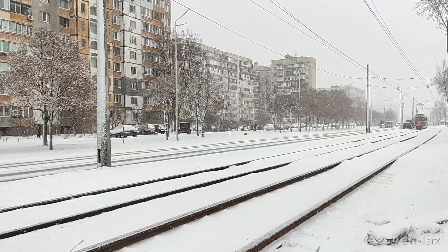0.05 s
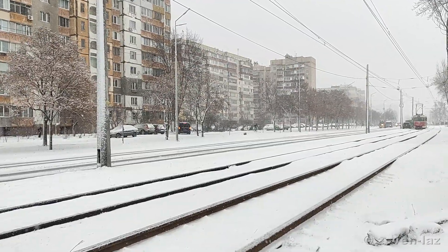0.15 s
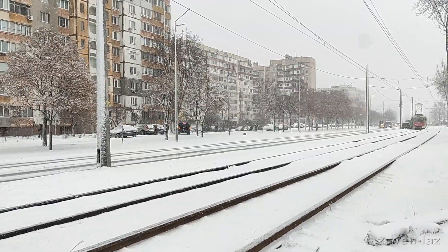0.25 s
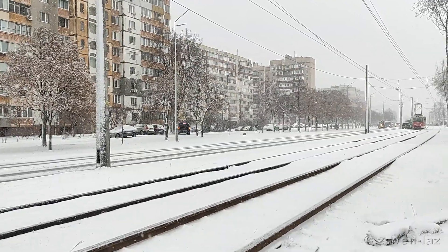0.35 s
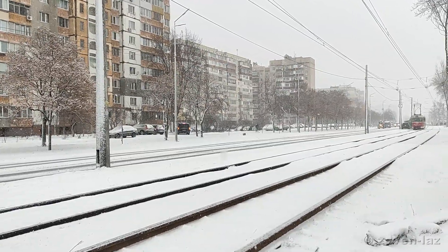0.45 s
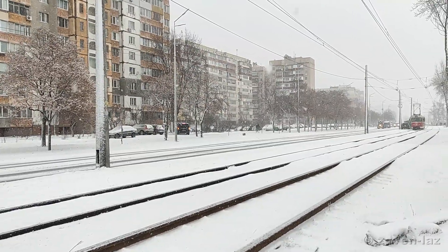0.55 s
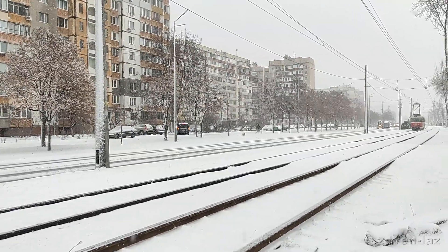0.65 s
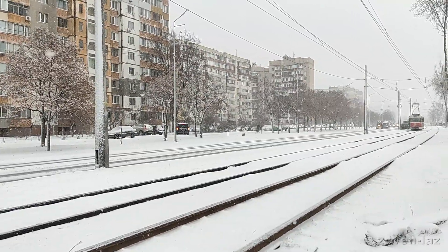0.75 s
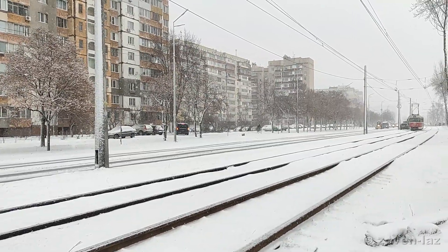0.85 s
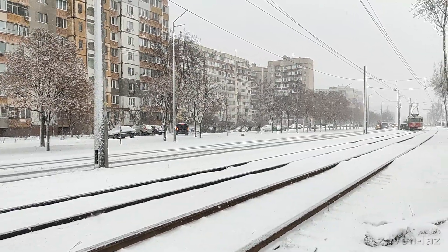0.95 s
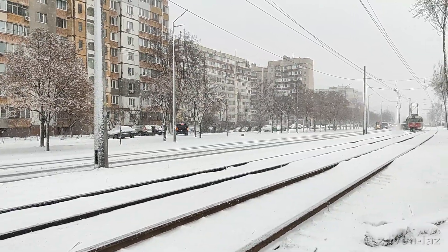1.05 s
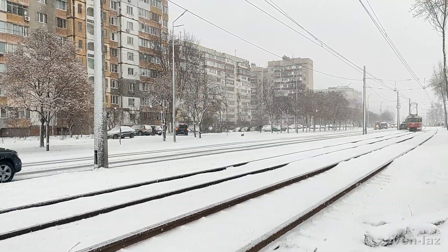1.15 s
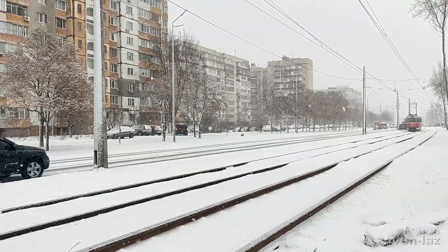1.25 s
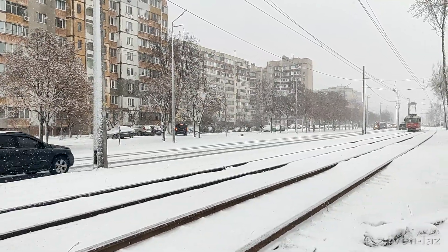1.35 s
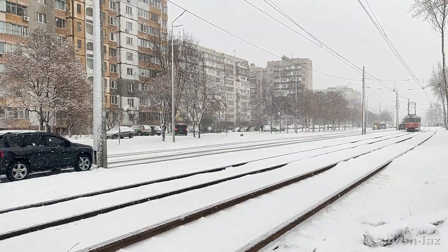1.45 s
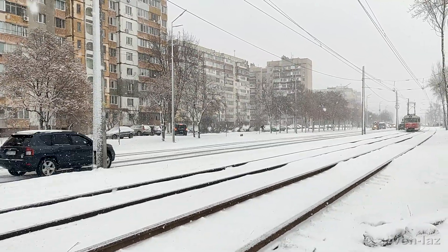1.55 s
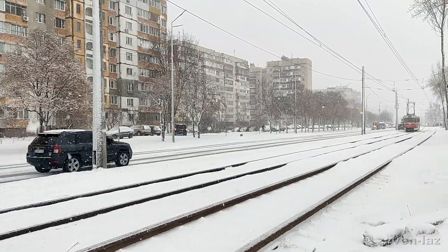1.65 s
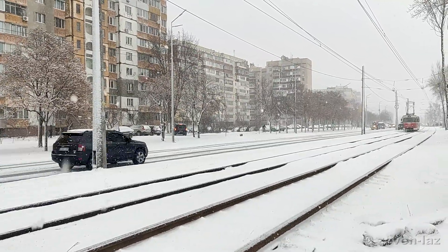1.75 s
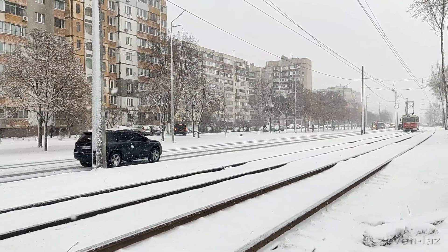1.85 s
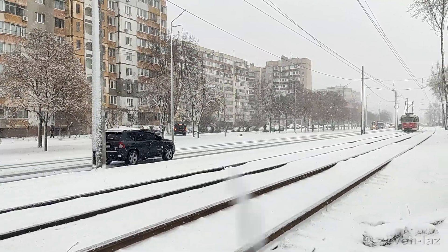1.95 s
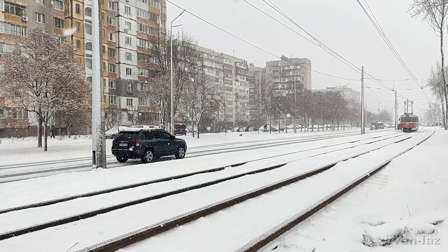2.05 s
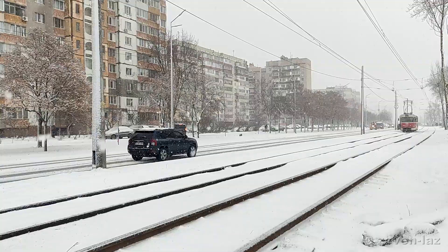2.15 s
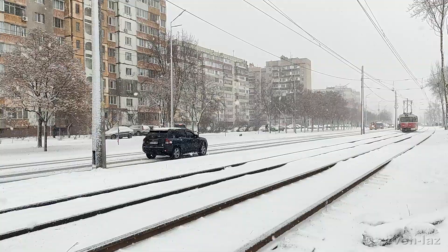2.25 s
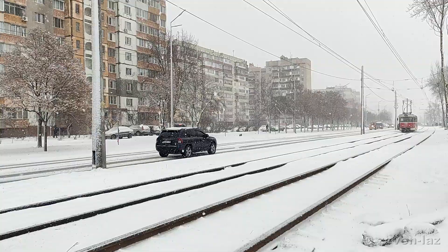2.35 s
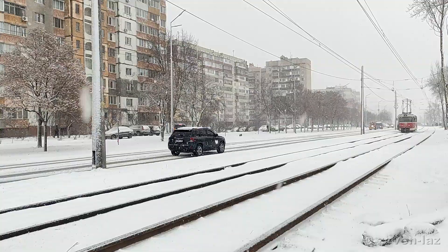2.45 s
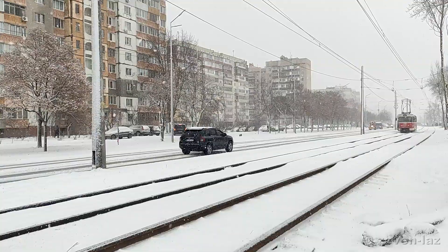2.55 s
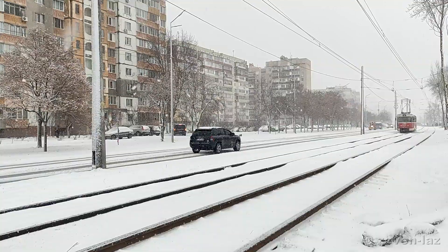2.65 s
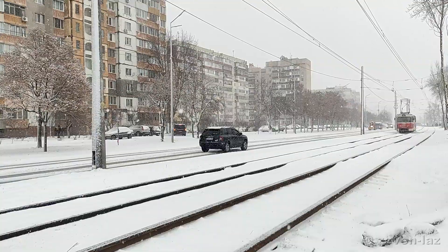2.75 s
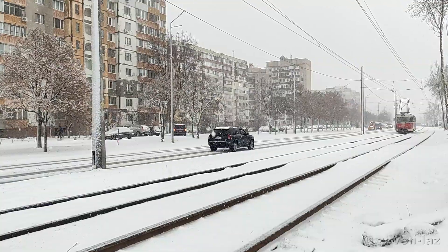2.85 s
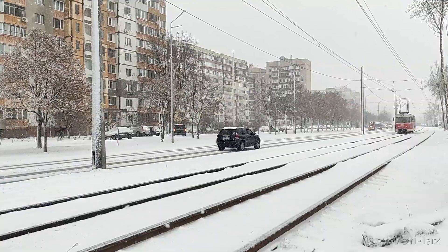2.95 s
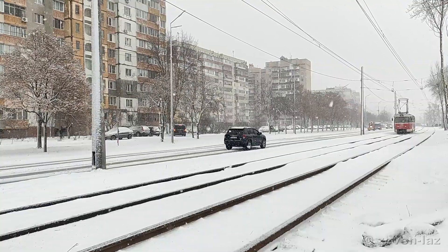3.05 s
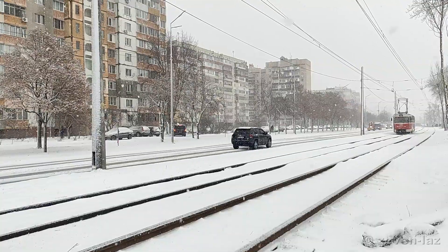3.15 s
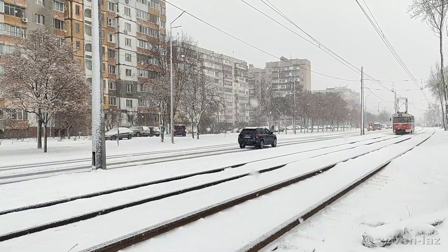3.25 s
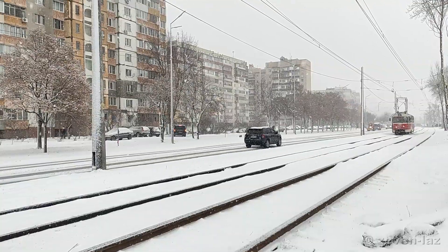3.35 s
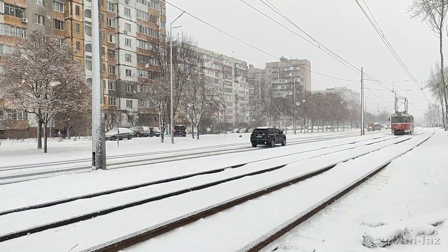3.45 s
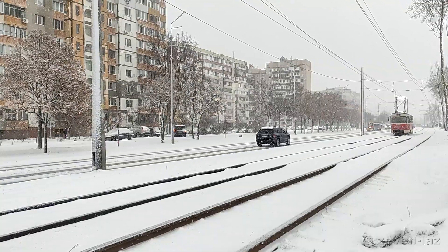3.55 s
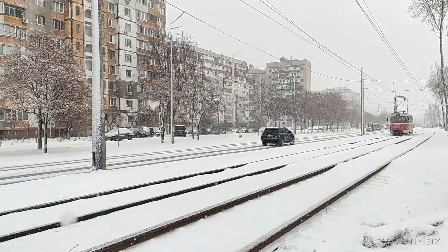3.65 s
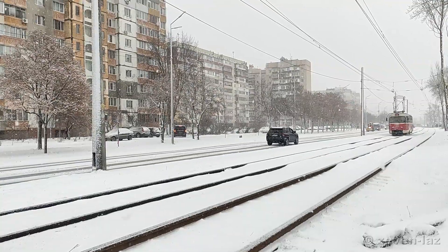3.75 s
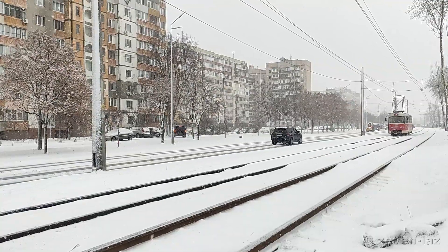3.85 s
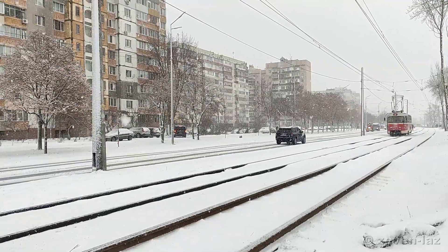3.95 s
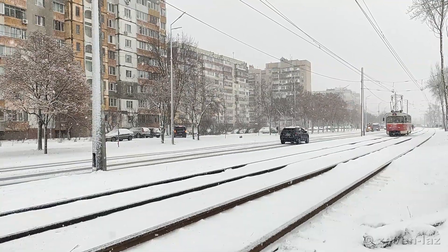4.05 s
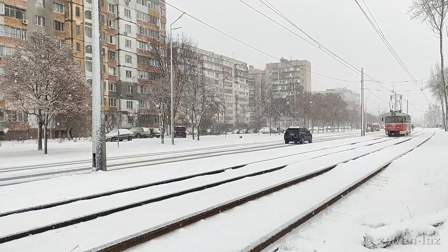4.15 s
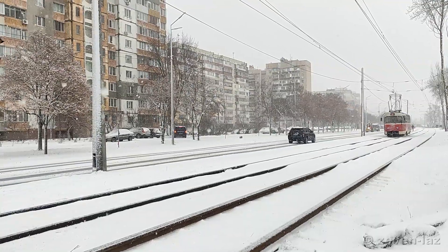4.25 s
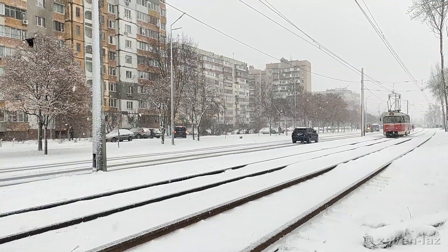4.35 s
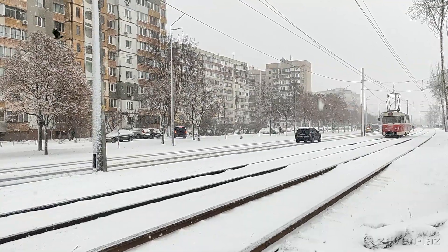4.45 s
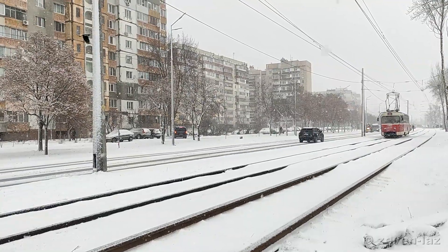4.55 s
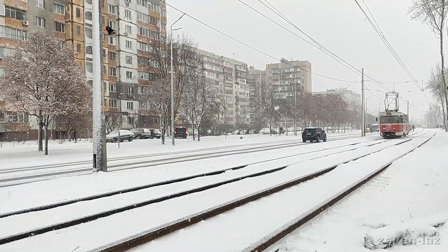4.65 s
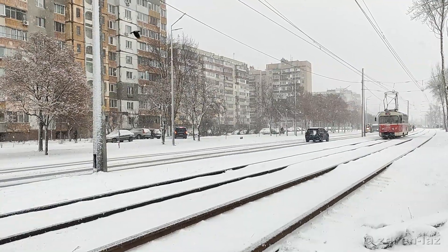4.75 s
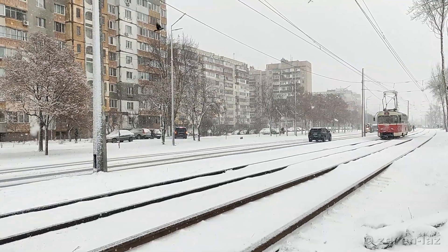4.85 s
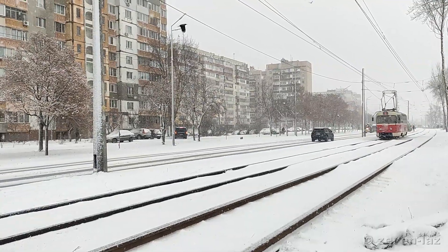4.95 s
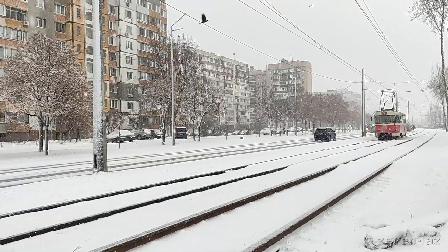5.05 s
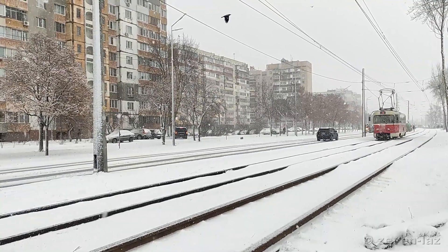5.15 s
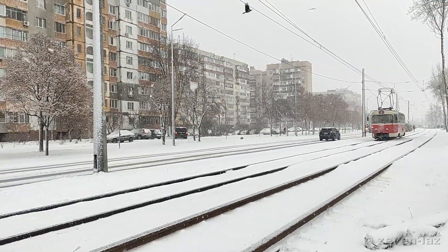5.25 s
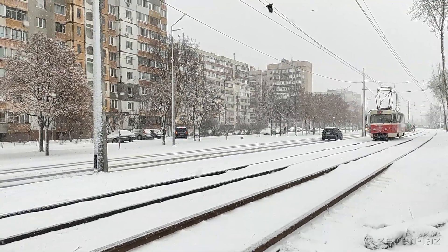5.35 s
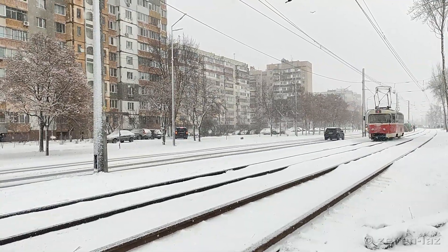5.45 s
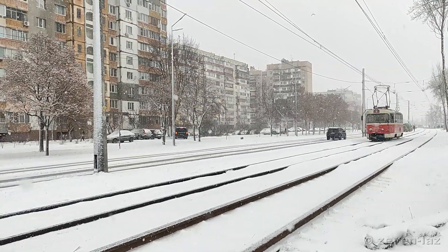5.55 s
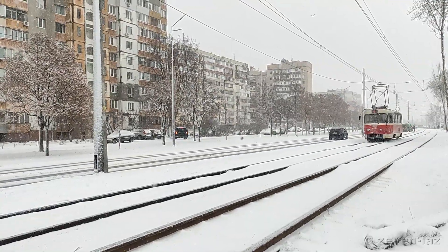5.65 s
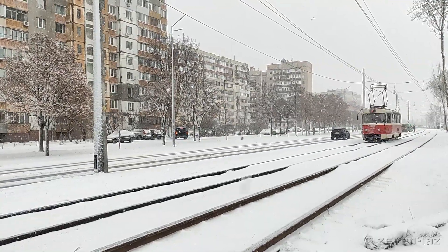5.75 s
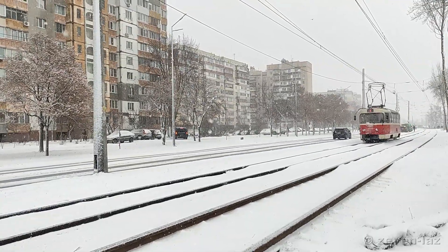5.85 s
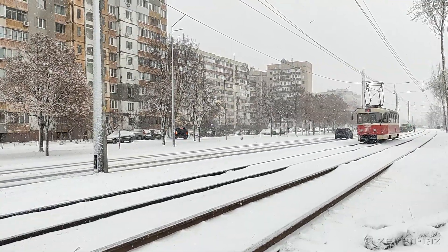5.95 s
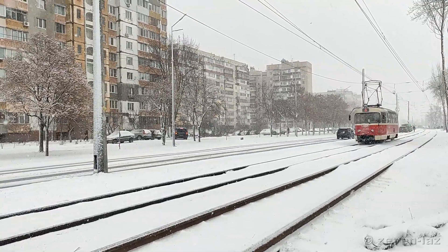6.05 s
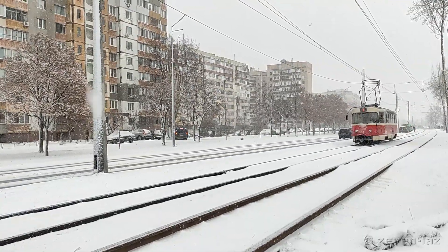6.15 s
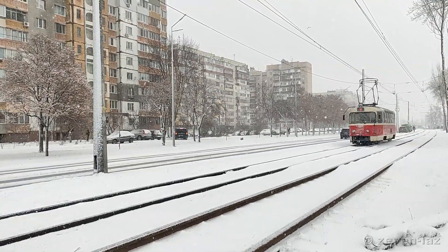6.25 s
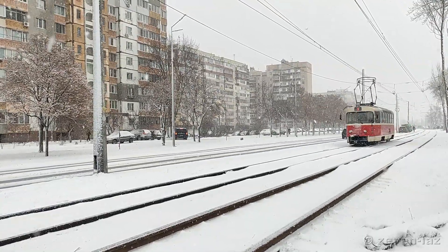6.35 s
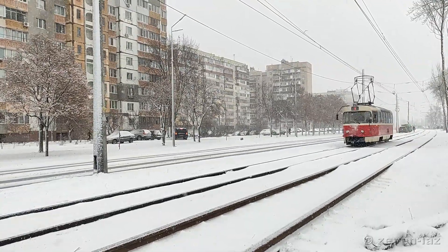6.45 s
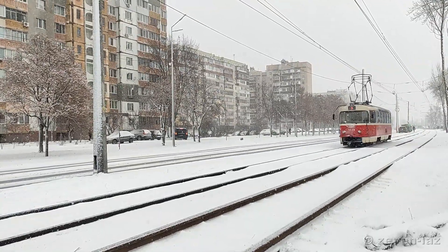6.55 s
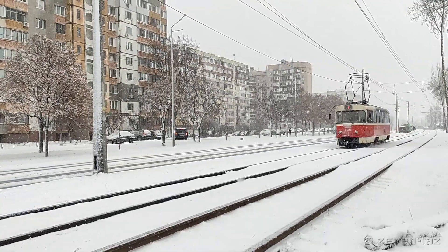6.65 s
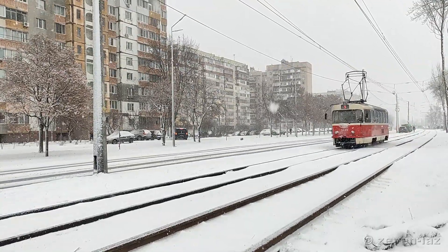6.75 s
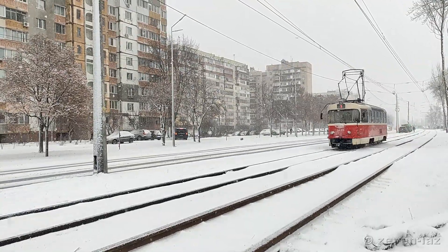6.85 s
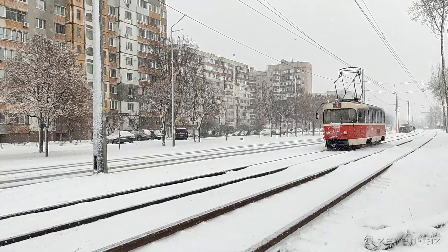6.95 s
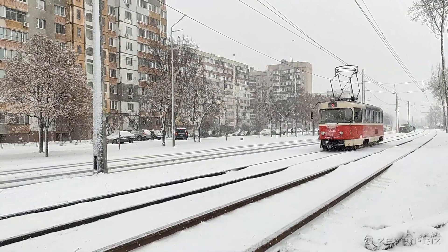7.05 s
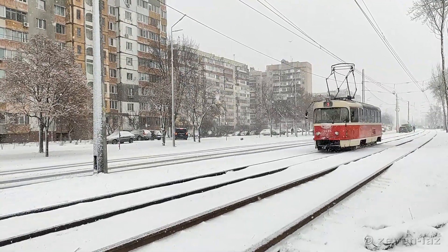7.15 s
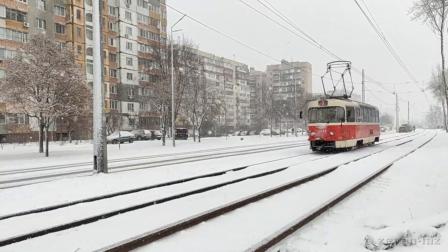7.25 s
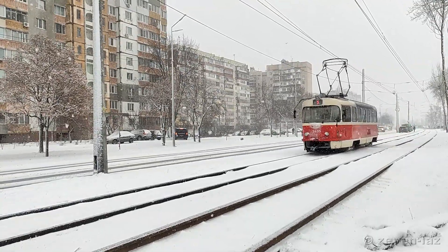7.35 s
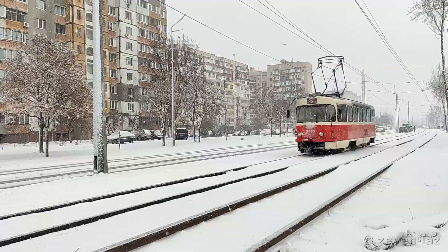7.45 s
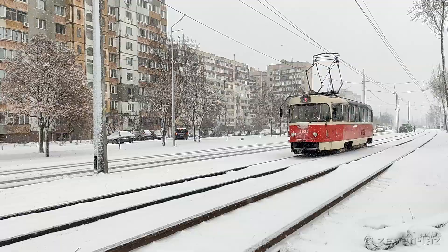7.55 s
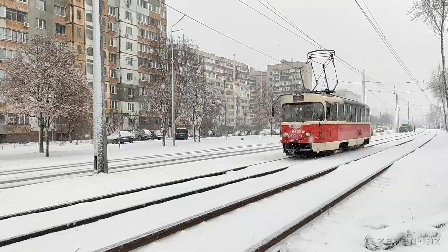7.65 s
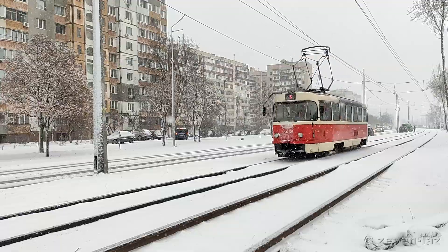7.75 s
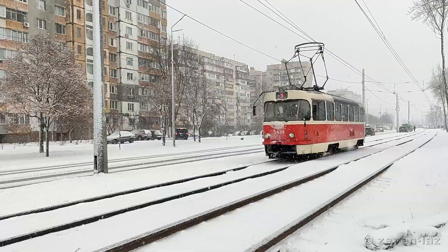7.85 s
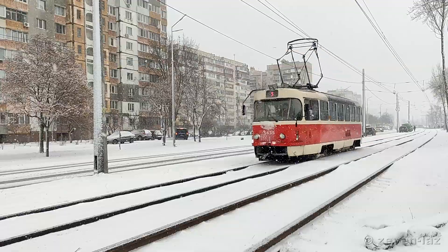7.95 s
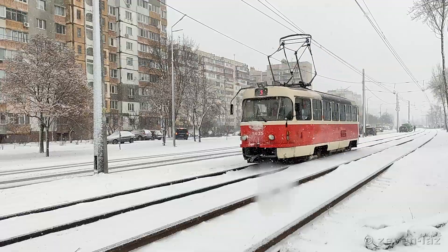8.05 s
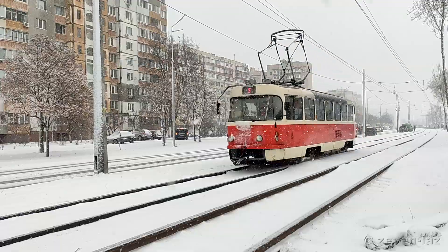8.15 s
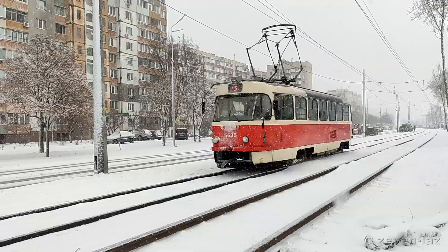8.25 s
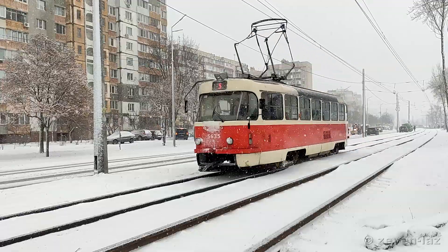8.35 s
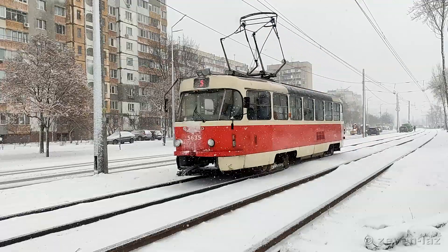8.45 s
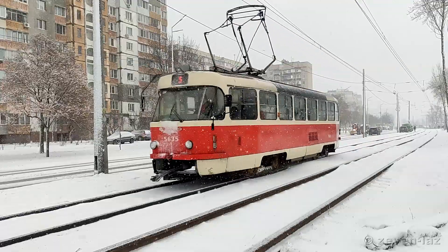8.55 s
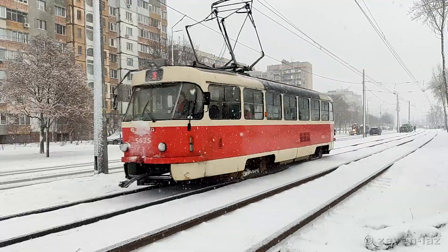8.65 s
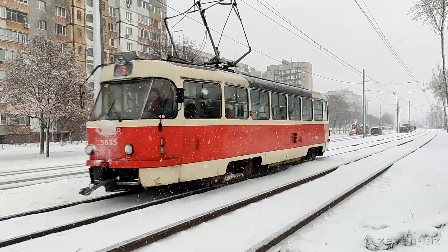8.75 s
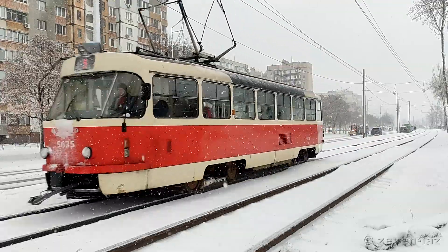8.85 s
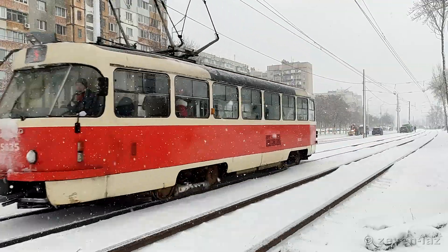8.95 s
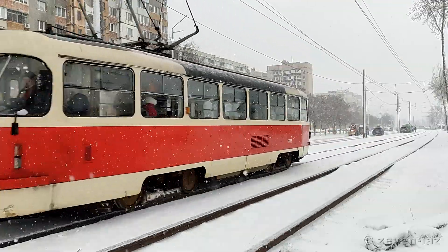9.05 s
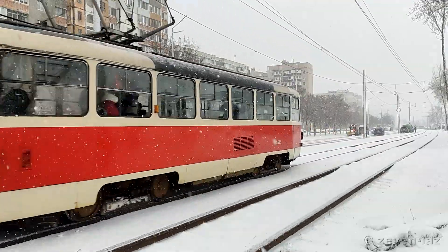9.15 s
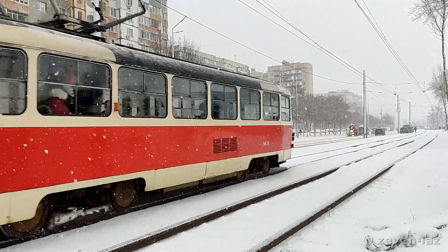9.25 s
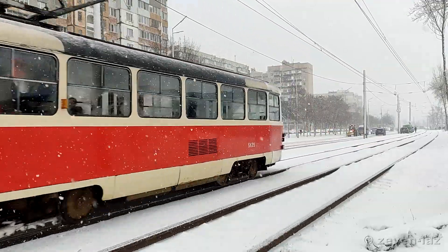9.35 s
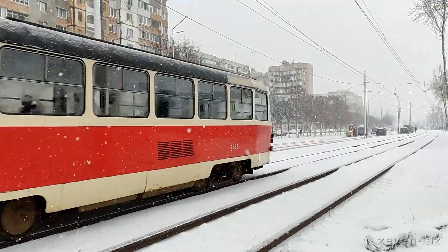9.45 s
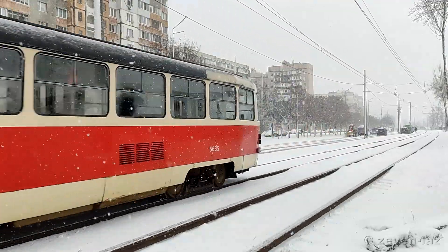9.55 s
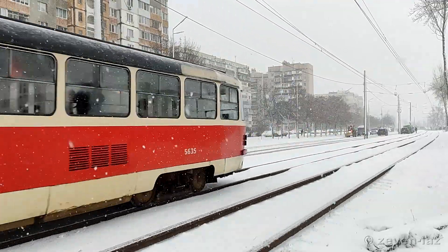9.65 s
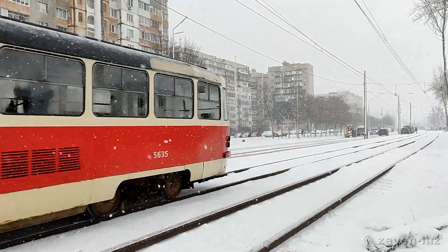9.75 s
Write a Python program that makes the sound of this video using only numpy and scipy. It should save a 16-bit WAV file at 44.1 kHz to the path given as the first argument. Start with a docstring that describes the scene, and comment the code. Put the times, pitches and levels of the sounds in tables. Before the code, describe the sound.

A diesel engine drones and clatters on a snow-muffled street as a car swishes past, then a tram rumbles up and passes close with knocks and rattling.

```python
"""Tram passing on a snowy street

A diesel at nearly steady speed drones on two engine orders (sines) with throbbing clatter (gated noise).
The street murmurs, dulled by snow, as a car drives by: shaped noise and two narrow hums; a few ticks.
A tram rolls up and passes close: wheel rumble, boom, grind and snow hiss are noise layers following distance.
Struck resonances make its pings, the knocks under it and the rattle of a loose part."""
import sys
import numpy as np
from scipy import signal
from scipy.fft import rfft, irfft, next_fast_len
from scipy.io import wavfile
from scipy.ndimage import uniform_filter1d

SR = 44100
rng = np.random.default_rng(int(sys.argv[2]) if len(sys.argv) > 2 else 0)


def dump(signal):
    """Clip the signal to [-1, 1] and save it as 16-bit WAV at the path in sys.argv[1]."""
    limited = np.clip(np.atleast_2d(signal).T, -1, 1)
    pcm = np.round(limited * 32767).astype(np.int16)
    wavfile.write(sys.argv[1], SR, pcm)


N = 431738   # samples


def amp(db):
    """dB to gain."""
    return 10 ** (np.asarray(db) / 20)


def rms_one(x):
    """Scale to rms 1."""
    return x / np.sqrt(np.mean(x ** 2) + 1e-20)


def in_time(rows, before_db=None):
    """Columns of a curve table, one value per sample."""
    s, *columns = np.transpose(rows)
    return [np.interp(np.arange(N) / SR, s, c, left=before_db) for c in columns]


def drift(rate_hz):
    """Slow noise of rms 1: two equal low-pass poles at rate_hz, run at SR / 40."""
    r = np.exp(-80 * np.pi * rate_hz / SR)
    noise = rng.standard_normal(N // 40 + 2002)
    slow = signal.lfilter([1], [1, -2 * r, r * r], noise)[2000:]   # settled part
    return np.interp(np.arange(N) / 40, np.arange(len(slow)), rms_one(slow))


def resonance(x, hz, width_hz):
    """Two-pole band-pass, gain about 1 on top."""
    r = np.exp(-np.pi * width_hz / SR)
    zeros = [(1 - r * r) / 2, 0, (r * r - 1) / 2]
    poles = [1, -2 * r * np.cos(2 * np.pi * hz / SR), r * r]
    return signal.lfilter(zeros, poles, x + 1e-18)


def body(x, modes):
    """Resonances side by side, signs alternating."""
    return sum((-1) ** k * amp(db) * resonance(x, hz, width) for k, (hz, width, db) in enumerate(modes))


def coloured(spectrum, patchy_db, rate_hz):
    """Noise of a given spectrum whose octaves swell partly together, partly alone; rms 1."""
    size = next_fast_len(N)
    octave = np.log2(np.maximum(np.arange(size // 2 + 1) * SR / size, 1))
    points = np.array(spectrum)
    gain_db = np.interp(octave, np.log2(points[:, 0]), points[:, 1])
    shaped = rfft(rng.standard_normal(size)) * amp(gain_db)
    out, together = np.zeros(N), drift(rate_hz)
    for centre in range(int(np.log2(points[1, 0])), int(np.log2(points[-2, 0])) + 2):
        band = np.clip(1 - np.abs(octave - centre), 0, 1)   # neighbouring triangles sum to one
        swell = amp(patchy_db * (together + drift(rate_hz)))
        out += swell * irfft(shaped * band, size)[:N]
    return rms_one(out)


def evened(x, span_s):
    """Slow level changes divided out."""
    return x / np.sqrt(uniform_filter1d(x ** 2, round(span_s * SR)) + 1e-9)


def burst(s, length_s):
    """Envelope that starts at once and decays by 1/e per length_s."""
    t = np.arange(N) / SR - s
    return (t >= 0) * np.exp(-np.clip(t, 0, 1) / length_s)


def hum(hz, width_hz):
    """Noise twice through a narrow resonance, level evened to about rms 1."""
    tone = resonance(resonance(rng.standard_normal(N), hz, width_hz), hz, width_hz)
    return evened(rms_one(tone), span_s=0.26)


def diesel():
    """Exhaust orders as wavering sines; the uneven knocks of each turn make the block's noise throb."""
    # t/s, shaft speed/(turns/s)
    speed_rows = [(0, 16.51), (2.8, 16.515), (4.2, 16.41), (4.9, 16.39), (6.3, 16.44), (7.0, 16.41),
                  (7.7, 16.36), (9.79, 16.33)]
    # t/s, sixth order level/dB, fourth order level/dB
    order_rows = [(0.0, -36, -43), (0.08, -43, -35), (0.19, -47, -52), (0.27, -32, -37), (0.49, -38, -42),
                  (0.98, -33.5, -35.5), (1.09, -42.5, -35), (2.42, -26, -37.5), (2.59, -36, -40),
                  (2.67, -40, -34.5), (2.81, -28.5, -33), (3.13, -43, -29), (3.35, -30, -36.5),
                  (3.41, -37, -46), (4.25, -29, -50), (4.36, -24.5, -61), (4.44, -27, -54),
                  (4.96, -27, -35.5), (7.39, -26, -33.5), (7.6, -28.5, -40), (9.21, -24.5, -28.5),
                  (9.6, -36, -38), (9.65, -24, -28), (9.79, -29, -34)]
    # six knocks of one turn: relative strength/dB
    strokes_db = [0, -3, -5, -12, -9, -12]
    # clatter spectrum: f/Hz, relative density/dB
    clatter_spectrum = [(660, -51.5), (1120, -32), (1190, -29.5), (1510, -2), (1550, 1), (1900, 2.5),
                        (2210, 0), (2330, -6.5), (2500, -25.5), (2680, -16.5), (3170, -20.5), (3590, -16.5),
                        (3820, -20), (4500, -29), (5850, -58), (9900, -120)]
    # ringing panels: f/Hz, width/Hz, relative level/dB
    panel_modes = [(1640, 22, 3), (1840, 25, 3), (1970, 30, 3), (2130, 22, 3)]
    # t/s, clatter level/dB
    clatter_rows = [(0.0, -53), (2.1, -50), (4.0, -49), (5.23, -45.5), (6.5, -46), (6.8, -43), (8.2, -44.5)]
    knock_s, throb_share = .011, .6

    sixth_db, fourth_db = in_time(order_rows)
    turn = np.cumsum(in_time(speed_rows)[0]) / SR
    drone = amp(sixth_db + 1.2 * drift(6)) * np.sin(2 * np.pi * 6 * turn + .15 * drift(3))
    drone += amp(fourth_db + 1.5 * drift(4)) * np.sin(2 * np.pi * 4 * turn + .2 * drift(3))

    stroke = (turn * len(strokes_db)).astype(int)
    starts = np.diff(stroke, prepend=0) > 0
    strength_db = np.array(strokes_db)[stroke % len(strokes_db)] + 0.83 * rng.standard_normal(N)
    knocks = starts * amp(strength_db)
    gate = rms_one(signal.lfilter([1], [1, -np.exp(-1 / (knock_s * SR))], knocks))
    block = coloured(clatter_spectrum, patchy_db=.25, rate_hz=5) * (1 - throb_share + throb_share * gate)
    clatter = block + amp(-8.5) * body(block, panel_modes)
    return np.sqrt(2) * drone + amp(in_time(clatter_rows)[0]) * rms_one(clatter)


def street():
    """Street noise bands from deep rumble to fine hiss, a car on snow, and two hums of unseen machines."""
    # spectra: f/Hz, relative density/dB
    rumble_spectrum = [(12, -71), (20, -40), (46, -14), (69, -9.5), (81, 3.5), (91, -3.5), (114, -4.5),
                       (121, -9), (130, -23.5), (170, -61.5), (290, -120)]
    roar_spectrum = [(62, -37), (105, -4.5), (113, -15.5), (124, -1.5), (161, -2.5), (193, -16),
                     (320, -15.5), (420, -56), (700, -120)]
    murmur_spectrum = [(120, -33.5), (200, -1.5), (285, -2.5), (343, -7), (421, -8.5), (452, -7),
                       (496, -9.5), (537, -6), (580, -8), (838, -11.5), (965, -12), (1150, -24),
                       (1300, -16), (1690, -37), (2860, -120)]
    tyre_spectrum = [(680, -43.5), (1150, -5), (1240, -8.5), (1500, -5), (1670, -5), (1840, -3.5),
                     (2440, -2), (2660, -7), (3000, -14.5), (3520, -18), (4040, -24), (4500, -29.5),
                     (5850, -68.5), (9900, -120)]
    spray_spectrum = [(3900, -30.5), (4400, 1.5), (5000, 4), (5700, 0.5), (6000, -26)]
    air_spectrum = [(5500, -31.5), (5800, -19), (5900, 1), (6640, 0.5), (7250, -1), (7600, -5.5),
                    (9000, -38.5)]
    # car tyres on snow: t/s, level/dB
    tyre_rows = [(0.0, -51.5), (0.9, -51.5), (2.0, -51), (2.5, -49), (3.0, -51), (4.0, -53.5), (5.5, -55),
                 (7.0, -67)]
    # street murmur, low roar, and top hiss that swells as the tram nears:
    # t/s, murmur level/dB, low roar level/dB, top hiss level/dB
    band_rows = [(0.0, -46, -40.5, -66.5), (0.6, -43.5, -40.5, -70), (1.4, -42.5, -38, -72),
                 (1.7, -42, -43, -71.5), (2.5, -42, -45.5, -69), (3.3, -43, -41.5, -70),
                 (4.5, -43, -44.5, -70.5), (5.5, -43, -50, -69), (6.4, -43, -47, -74),
                 (7.2, -44, -43, -65.5), (7.7, -44, -36, -59.5), (8.4, -46, -38, -66)]
    # hums: f/Hz, width/Hz
    hum_modes = [(530.5, 14), (52.12, 2.9)]
    # t/s, first hum level/dB, second hum level/dB
    hum_rows = [(0.0, -51.5, -53), (0.7, -53.5, -38), (2.0, -62, -43), (2.6, -62, -45), (3.301, -53, -49.5),
                (4.4, -57, -38), (5.0, -50, -50), (5.7, -51.5, -32.5), (7.1, -54.5, -38), (7.8, -48.5, -40),
                (8.5, -54, -28), (9.79, -49.5, -40)]
    rumble_db, spray_db = -35.5, -79.5
    swish_s, swish_half_s, swish_db = 2.6, 0.75, -74.5   # slush under the car: middle, half length, peak

    tyre_db = in_time(tyre_rows)[0]
    murmur_db, roar_db, top_db = in_time(band_rows)
    out = amp(rumble_db) * evened(coloured(rumble_spectrum, patchy_db=0.7, rate_hz=1.6), span_s=0.13)
    out += amp(roar_db) * coloured(roar_spectrum, patchy_db=1.0, rate_hz=2.2)
    out += amp(murmur_db) * coloured(murmur_spectrum, patchy_db=0.97, rate_hz=9.7)
    out += amp(tyre_db) * coloured(tyre_spectrum, patchy_db=1.0, rate_hz=13.0)
    swish = amp(swish_db) * np.exp(-((np.arange(N) / SR - swish_s) / swish_half_s) ** 2)
    out += np.hypot(amp(spray_db), swish) * coloured(spray_spectrum, patchy_db=.8, rate_hz=12.0)
    out += amp(top_db) * coloured(air_spectrum, patchy_db=1.1, rate_hz=8.0)
    for (hz, width_hz), db in zip(hum_modes, in_time(hum_rows)):
        out += amp(db) * hum(hz, width_hz)
    return out


def passing(level_db, fall_db):
    """Gain of a layer both bogies send out, falling by fall_db per tenfold distance."""
    # bogie comes abreast: t/s, relative level/dB
    bogie_rows = [(9.1, -1.5), (9.72, 2)]
    speed_m_per_s, track_m = 10.43, 4.56   # tram speed, distance from microphone to track
    t = np.arange(N) / SR
    power = 0
    for s, db in bogie_rows:
        distance_m = np.hypot(speed_m_per_s * (t - s), track_m)
        power = power + amp(2 * (db - fall_db * np.log10(distance_m / track_m)))
    return amp(level_db) * np.sqrt(power)


def tram():
    """Deep hum, wheel rumble with ringing bogie frame, body boom, rolling, grind and snowy-rail hiss."""
    # spectra: f/Hz, relative density/dB
    wheel_spectrum = [(15, -43), (25, -28.5), (59, -6.5), (92, -3), (131, 3), (195, -4.5), (250, -44),
                      (430, -120)]
    boom_spectrum = [(110, -25.5), (190, -6), (227, 1), (345, -14), (450, -43), (760, -120)]
    rolling_spectrum = [(190, -24), (320, -15), (366, -0.5), (512, 3), (560, -0.5), (788, -1.5), (857, -4),
                        (1020, -6), (1220, -10.5), (1590, -47.5), (2680, -120)]
    grind_spectrum = [(710, -42), (1200, -10.5), (1430, 4.5), (1570, -0.5), (1900, 4), (2180, -3),
                      (2360, -2.5), (2900, -14.5), (3770, -48), (6380, -120)]
    rail_hiss_spectrum = [(1590, -25), (2700, -1), (2980, -6.5), (3320, 1.5), (3640, -12), (4000, -8),
                          (4420, -16), (4860, -10.5), (5350, -15), (5640, -15.5), (5800, -11.5),
                          (7540, -39), (12800, -120)]
    snow_hiss_spectrum = [(3350, -30), (5700, -10), (6020, -1.5), (6480, -1.5), (7160, 3), (7600, -1.5),
                          (9880, -46.5), (16700, -120)]
    # bogie frame: f/Hz, width/Hz, relative level/dB
    frame_modes = [(77, 13, -4), (123.6, 8, 2), (140.3, 14, 3), (183, 13.6, 2.5), (224.7, 19, -3.5)]
    # surges of rumble and boom: t/s, gain/dB
    surge_rows = [(7.4, 0), (8.25, 0), (8.45, 3), (8.62, -3), (8.72, 3.5), (8.86, -1.5), (8.95, 1.5),
                  (9.16, 3), (9.4, 0.5), (9.63, 3), (9.79, 3)]

    frame = rms_one(body(rng.standard_normal(N), frame_modes))
    rumble = coloured(wheel_spectrum, patchy_db=3.0, rate_hz=6.4) + amp(0.5) * frame
    boom = coloured(boom_spectrum, patchy_db=4.0, rate_hz=33.0)
    surge = amp(in_time(surge_rows)[0])
    out = passing(level_db=-40, fall_db=20) * hum(hz=38.3, width_hz=2.9)
    out += surge * passing(level_db=-19.5, fall_db=29.8) * evened(rumble, span_s=0.6)
    out += surge * passing(level_db=-25.5, fall_db=38) * evened(boom, span_s=0.39)
    out += passing(level_db=-29.5, fall_db=30.3) * coloured(rolling_spectrum, patchy_db=0.66, rate_hz=32.0)
    out += passing(level_db=-34.5, fall_db=27.9) * coloured(grind_spectrum, patchy_db=1.2, rate_hz=25.0)
    out += passing(level_db=-47, fall_db=23.5) * coloured(rail_hiss_spectrum, patchy_db=1.36, rate_hz=26.0)
    out += passing(level_db=-48.5, fall_db=24.2) * coloured(snow_hiss_spectrum, patchy_db=1.47, rate_hz=23.0)
    return out


def ticks():
    """Single clicks ringing briefly in the treble."""
    # t/s, click level before ringing/dB
    tick_rows = [(1.712, -34), (3.6625, -27.5), (3.7748, -33), (6.2941, -30), (6.3455, -39)]
    # f/Hz, width/Hz, relative level/dB
    tick_modes = [(3800, 1500, 1), (6540, 1400, 9)]
    clicks = np.zeros(N)
    for s, db in tick_rows:
        clicks[round(s * SR)] = amp(db)
    return body(clicks, tick_modes)


def pings():
    """Running gear: one high metallic mode, struck and quickly damped."""
    # t/s, starting amplitude/dB
    ping_rows = [(8.265, -31), (8.368, -29), (8.556, -22.5), (8.590, -29), (8.657, -35), (8.805, -22)]
    ping_hz, ring_s = 1940, 0.0067
    t = np.arange(N) / SR
    return sum(amp(db) * burst(s, ring_s) * np.sin(2 * np.pi * ping_hz * (t - s)) for s, db in ping_rows)


def tram_knocks():
    """At each knock a thud that builds for a cycle, a hard crack, a ringing rim and a bright snap."""
    # knocks under the passing tram:
    # t/s, relative knock/dB, relative thud/dB, relative snap/dB, knock decay/s
    knock_rows = [(8.507, -16.5, -4.5, -34, 0.011), (8.6914, -11, -17, -29.5, 0.02),
                  (8.797, -21, -20.5, -53, 0.012), (8.951, -22, -18, -49, 0.012),
                  (9.13, -15, -28, -39, 0.02), (9.17, -29, -34, -40, 0.012), (9.325, -14.5, -41, -38, 0.02),
                  (9.386, -16, -38, -43, 0.018), (9.529, -16, -25, -36, 0.011),
                  (9.7205, -17, -11, -45, 0.0061)]
    # thud: f/Hz, width/Hz, relative level/dB
    thud_modes = [(245, 150, 2), (520, 260, -11)]
    # wheel rim: f/Hz, width/Hz, relative level/dB
    rim_modes = [(595, 120, 4), (1020, 624, 1.5), (1420, 680, 5.5), (1603, 310, 3.5), (1866, 98, -3),
                 (2300, 580, -4.5)]
    snap_lag_s = 0.002   # snap follows thud

    blows, knock_gate, snap_gate = np.zeros((3, N))
    for s, knock_db, thud_db, snap_db, length_s in knock_rows:
        blows[round(s * SR)] = -amp(thud_db)
        knock_gate += amp(knock_db) * burst(s, max(length_s, .002))
        snap_gate += amp(snap_db) * burst(s + snap_lag_s, max(0.27 * length_s, .002))
    thud = body(body(blows, thud_modes), thud_modes)   # rail and wheel ring alike
    crack = resonance(resonance(blows, 800, 700), 700, 900)   # hard first contact
    knock = body(rng.standard_normal(N) * knock_gate, rim_modes)
    high_pass = signal.butter(2, 3500, "high", fs=SR, output="sos")
    snap = signal.sosfilt(high_pass, rng.standard_normal(N) * snap_gate)
    return amp(41.5) * thud + amp(8) * crack + amp(6.0) * knock + amp(4.5) * snap


def rattle():
    """Loose part: uneven taps open short noise puffs into high modes, each struck at its own strength."""
    # as the bogies pass: t/s, level/dB
    rattle_rows = [(8.55, -79), (8.75, -38), (9.0, -45), (9.2, -40), (9.55, -45), (9.79, -44)]
    # f/Hz, width/Hz, relative strike/dB
    rattle_modes = [(2373, 110, 10), (2590, 120, -5.5), (1810, 110, -17.5)]
    taps_per_s, puff_s = 34, .005   # mid tap rate, puff decay

    beat = np.cumsum(taps_per_s * amp(2.5 * drift(8))) / SR
    taps = np.diff(beat.astype(int), prepend=0) > 0
    out = np.zeros(N)
    for hz, width_hz, db in rattle_modes:
        struck = taps * amp(db + 3.0 * rng.standard_normal(N))
        puff_gate = signal.lfilter([1], [1, -np.exp(-1 / (puff_s * SR))], struck)
        puffs = puff_gate * rng.standard_normal(N)
        out += resonance(resonance(puffs, hz, width_hz), hz, 200)
    return amp(in_time(rattle_rows, before_db=-120)[0]) * rms_one(out)


def scene():
    """All sources at one microphone."""
    return (diesel() + street() + tram() + ticks() + pings() + tram_knocks() + rattle())[None]


def record(dry):
    """The deepest bass is cut, peaks are rounded, the top is cut."""
    cutoff_hz = 7580
    rolled = signal.sosfilt(signal.butter(2, 25, "high", fs=SR, output="sos"), dry)
    rounded = .95 * np.tanh(rolled / .95)
    return signal.sosfilt(signal.ellip(12, .5, 70, cutoff_hz, fs=SR, output="sos"), rounded)


dry = scene()
out = record(dry)
dump(out)
```